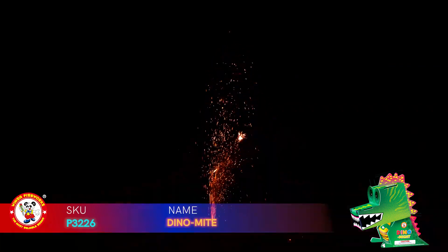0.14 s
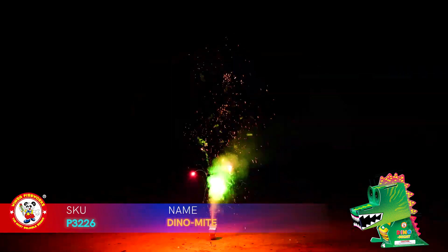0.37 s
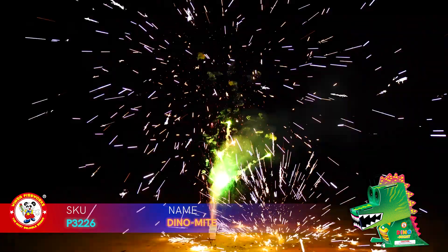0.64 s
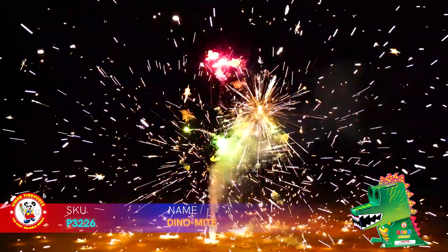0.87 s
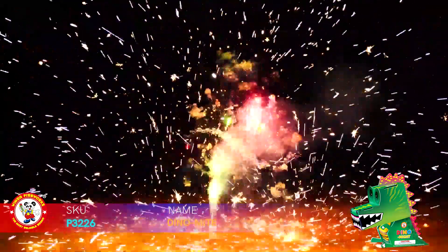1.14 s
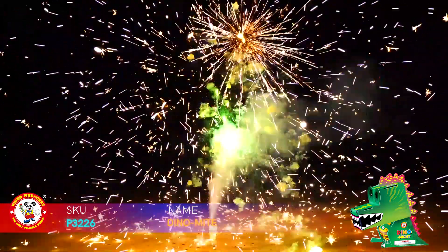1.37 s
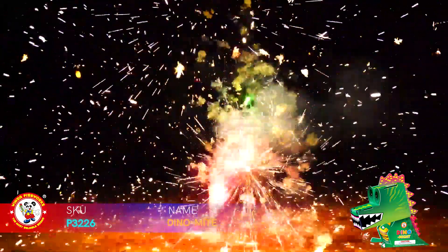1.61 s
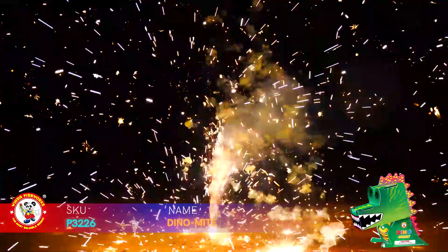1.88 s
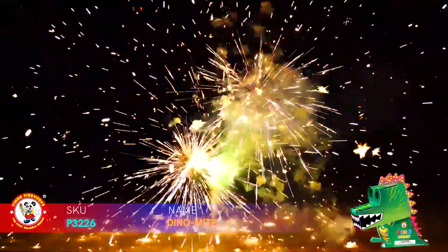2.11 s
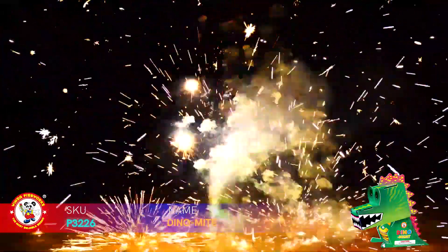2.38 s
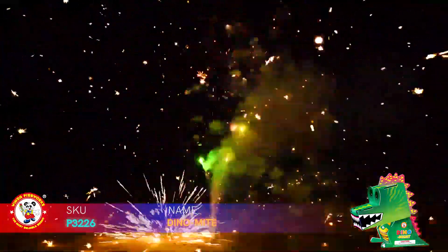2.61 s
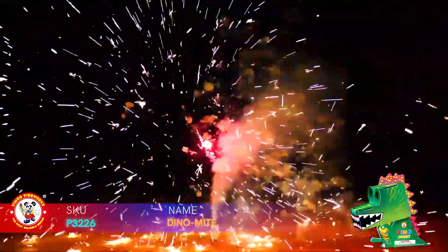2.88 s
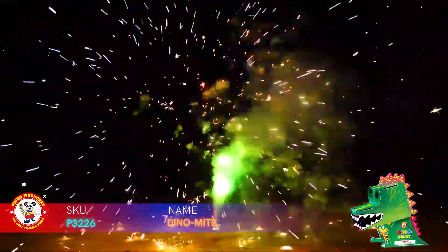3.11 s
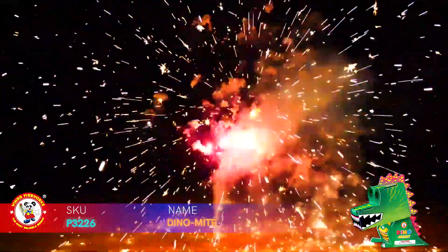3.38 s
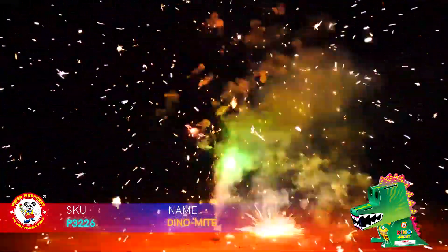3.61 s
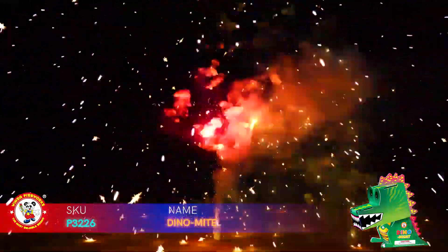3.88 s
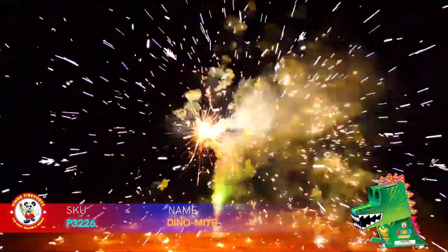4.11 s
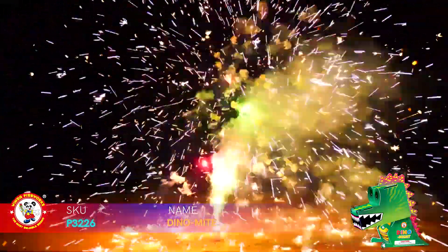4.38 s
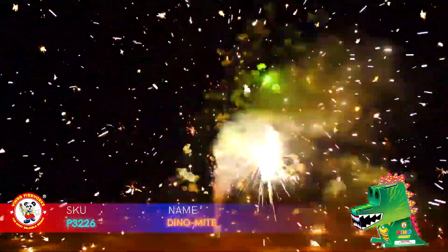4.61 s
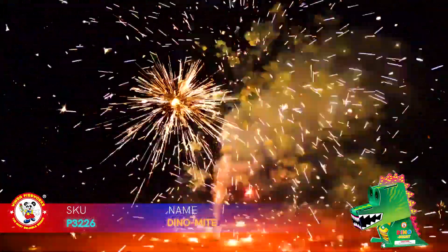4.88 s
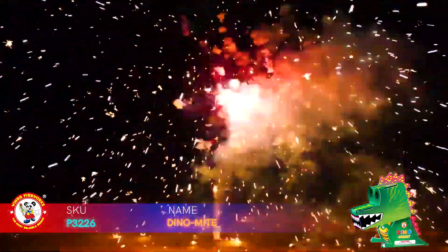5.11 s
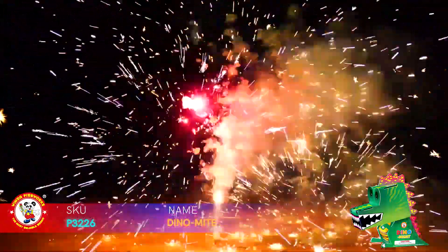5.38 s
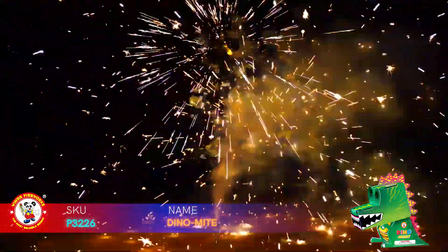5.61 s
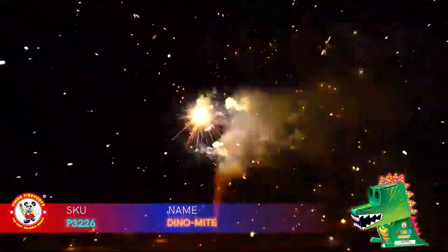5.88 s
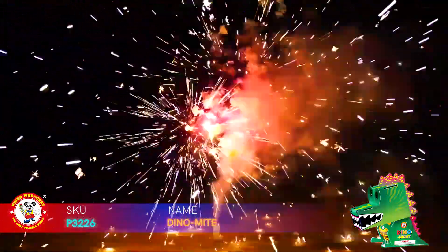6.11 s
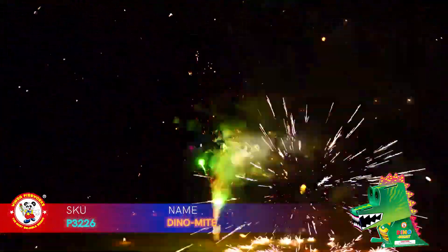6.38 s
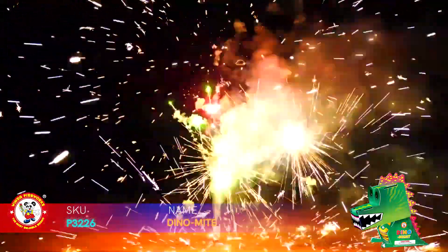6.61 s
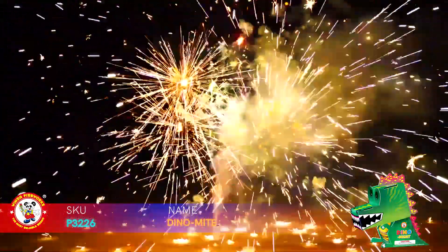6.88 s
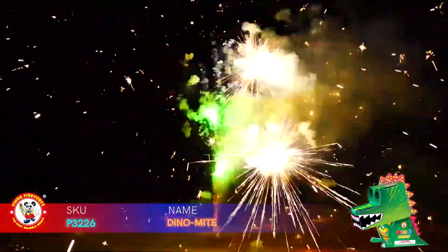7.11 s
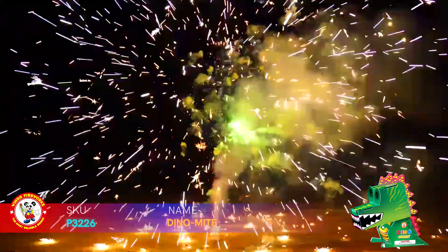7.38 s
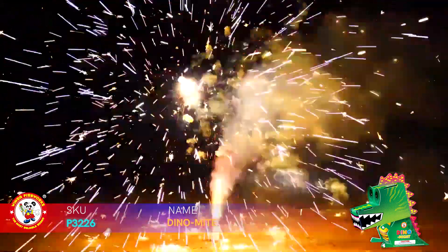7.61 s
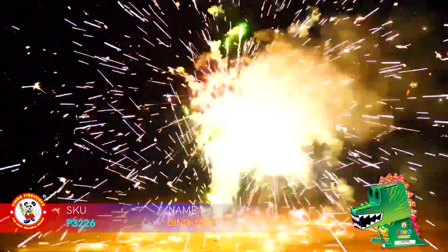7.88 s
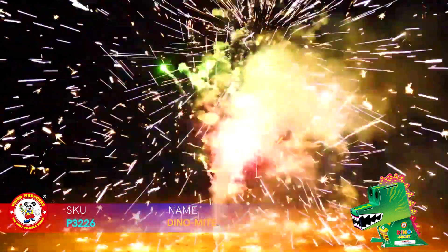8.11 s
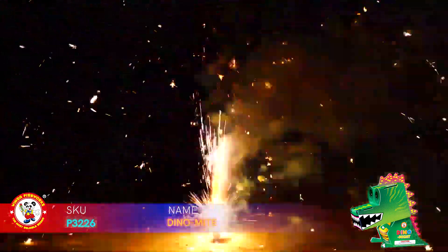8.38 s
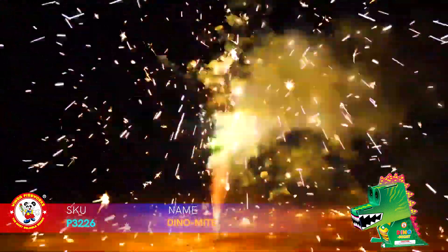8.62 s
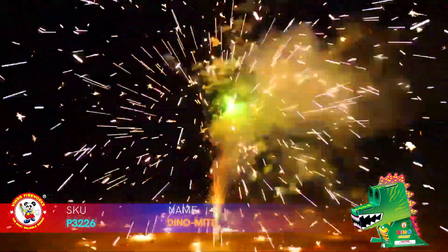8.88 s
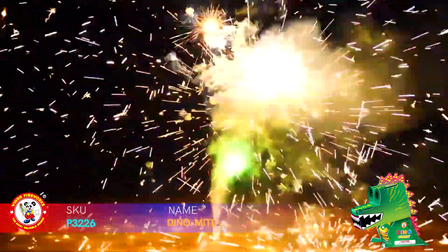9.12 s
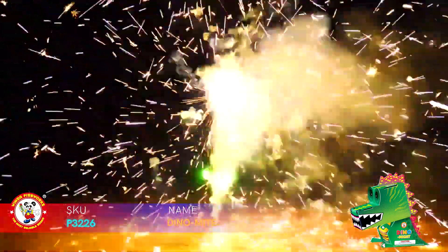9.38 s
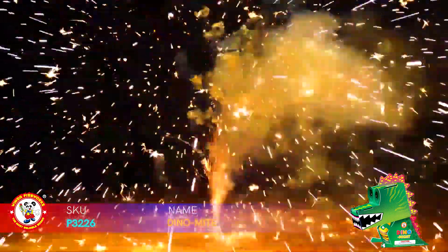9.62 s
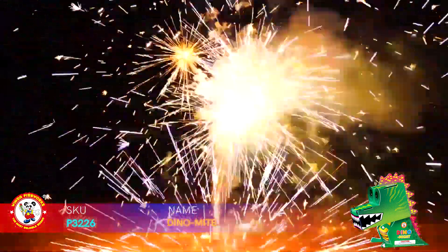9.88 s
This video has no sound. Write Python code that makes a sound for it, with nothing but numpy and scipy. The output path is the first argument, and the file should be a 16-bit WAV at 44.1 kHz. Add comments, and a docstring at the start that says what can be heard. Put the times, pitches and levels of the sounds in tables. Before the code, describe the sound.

Short hollow rush of a firework fountain, then ten-second barrage of bright irregular crackles, a few louder dry snaps, slightly overloaded microphone.

```python
"""A ground firework fountain at night, heard from a few metres away. First its jet roars in the resonances of
the tube and fizzes with sparks; at 0.7 s it drops and burns on, lower, to the end. From then on stars burst in
the air: each blast arrives straight, again off the ground, and again from walls and the wider yard.
From 1.8 s on a few dry, bright snaps with a thump stand out, as if close to the microphone.
The blasts are noise-free pushes of air; the jet is shaped noise. The loudest peaks overload the microphone."""
import sys
import numpy as np
from scipy import signal
from scipy.fft import rfft, irfft, next_fast_len
from scipy.io import wavfile
from scipy.ndimage import map_coordinates

SR = 44100
rng = np.random.default_rng(int(sys.argv[2]) if len(sys.argv) > 2 else 0)


def natural_amplitude(level_db):
    """Convert a level in decibels to a linear amplitude factor, elementwise."""
    exponent = np.asarray(level_db, float) / 20
    return 10 ** exponent


def dump(signal):
    """Clip the signal to [-1, 1] and save it as 16-bit WAV at the path in sys.argv[1]."""
    limited = np.clip(np.atleast_2d(signal).T, -1, 1)
    pcm = np.round(limited * 32767).astype(np.int16)
    wavfile.write(sys.argv[1], SR, pcm)


N = 440982  # length [samples], about 10 s


def along(points, hz):
    """Reads a curve of (frequency [Hz], value) points on a log frequency axis."""
    point_hz, value = np.transpose(points)
    return np.interp(np.log(hz + 1), np.log(point_hz + 1), value)


def unit(x):
    """Scales a sound to an rms of 1."""
    return x / np.sqrt(np.mean(x ** 2) + 1e-20)


def wobble(rate):
    """A smooth random curve through `rate` random points a second."""
    knots = rng.standard_normal(int(N * rate / SR) + 4)
    return map_coordinates(knots, [np.arange(N) * rate / SR])


def filtered(x, response):
    """Multiplies the spectrum of x by a complex response of frequency."""
    size = next_fast_len(x.shape[-1] + 8192)  # room for the ringing
    spectrum = rfft(x, size) * response(np.fft.rfftfreq(size, 1 / SR))
    return irfft(spectrum, size)[..., :x.shape[-1]]


def spread(pair, spectrum, alike):
    """Colours two unrelated noises and mixes them to a left-right likeness, 1 being the same in both ears."""
    def response(hz):
        turn = np.arccos(np.clip(along(alike, hz), -1, 1)) / 2
        return natural_amplitude(along(spectrum, hz)) * [np.cos(turn), np.sin(turn)]
    mid, side = filtered(pair, response)
    return np.array([mid + side, mid - side])


def impulses(s, gain):
    """Places impulses at times between samples, each as a short windowed sinc."""
    at = np.ravel(s)[:, None] * SR
    near = np.floor(at) + np.arange(-7, 9)
    window = np.cos(np.pi * (near - at) / 16) ** 2
    taps = np.ravel(gain)[:, None] * np.sinc(near - at) * window
    return np.bincount(np.clip(near, 0, N).astype(int).ravel(), taps.ravel(), N + 1)[:N]


def blast(hz, push_ms, edge_hz):
    """Spectrum of a small explosion: a push, then an equal suction, behind a rounded edge."""
    u = 2j * np.pi * hz * push_ms / 1000
    return u / (1 + u) ** 2 / (1 + 1j * hz / edge_hz) ** 2


def capsule(hz, ring_hz=12500, width_hz=5000, ring_db=8):
    """The microphone behind its port: treble arrives first and inverted, bass is cut, the port rings."""
    turn_hz, cut_hz = 1530, 610
    port = 1 + natural_amplitude(ring_db) * 1j * hz * width_hz / (ring_hz ** 2 - hz * hz + 1j * hz * width_hz)
    treble_first = (turn_hz - 1j * hz) / (turn_hz + 1j * hz)
    bass_cut = (1j * hz / (1j * hz + cut_hz)) ** 2
    return treble_first * bass_cut * port


# How long the yard rings: (frequency [Hz], time to fall by 60 dB [s])
YARD_RING = [(150, 1), (1000, 1), (4000, 0.9), (14000, 0.69)]
# Tone of the yard: (frequency [Hz], level [dB])
YARD_TONE = [(100, 12.5), (500, -5), (2000, -8), (5500, -0.5), (11000, -9.5), (16000, -1)]
# How alike the yard sounds in both ears: (frequency [Hz], left-right likeness [-1 to 1])
YARD_LIKENESS = [(60, -0.43), (290, 0.89), (640, 0.63), (1400, 0.054), (3100, -0.61), (7000, 0.046)]


def yard(trains):
    """Far surfaces return a wash that dies by band; each group of bursts meets its own paths."""
    wash = np.zeros((2, N))
    for train in trains:
        hz, t, z = signal.stft(rng.standard_normal((2, SR)), SR, nperseg=256)
        clumps = map_coordinates(rng.standard_normal(len(t)), [t * 70])  # surfaces stand in clusters
        swell = (1 - np.exp(-t / 0.0041)) * natural_amplitude(5.9 * clumps)
        decay = natural_amplitude(-60 * t / along(YARD_RING, hz)[:, None])
        tail = signal.istft(z * swell * decay, SR, nperseg=256)[1]
        tail = spread(tail / np.linalg.norm(tail[0]), YARD_TONE, YARD_LIKENESS)
        wash += signal.fftconvolve(train[None], tail, axes=1)[:, :N]
    return wash


# Rough walls and fences: (delay [ms], smear [ms], left level [dB], right level [dB],
# lateness of the left ear before the scaling in walls() [ms])
WALL_ECHOES = [(3.463, 1.0, -24, -18.5, 0.074), (12.09, 1.5, -42, -22.5, 0.25), (15.02, 1, -26, -41, -0.25),
               (26.89, 3, -19.5, -25.5, -0.21), (42.4, 2, -23, -31.5, -0.23), (86.8, 3.5, -27, -20, 0.21),
               (110.4, 1.2, -15.5, -20, -0.25)]


def walls(s, db, facets=10):
    """A rough wall breaks each blast into a cluster of small echoes, stronger on one side."""
    delay_ms, smear_ms, left_db, right_db, late_ms = np.transpose(WALL_ECHOES)[..., None]
    luck = rng.standard_normal((len(s), 4, len(WALL_ECHOES), facets))
    arrive = s[:, None, None] + (delay_ms + smear_ms * luck[:, 0]) / 1000
    swing_db = 3 * luck[:, 1, :, :1]  # a wall answers more or less from burst to burst
    ears = []
    for side, wall_db in ((0.61, left_db), (-0.58, right_db)):
        level = natural_amplitude(db[:, None, None] + wall_db + swing_db)
        facet_gain = luck[:, 2] + side * .5 * luck[:, 3]
        ears.append(impulses(arrive + side * late_ms / 2000, level * facet_gain))
    return np.array(ears)


# The strong jet at the start: (time [s], roar level [dB], fizz level against the roar [dB])
STRONG_JET = [(0.0, -15.5, 0), (0.678, -15, -0.5), (0.7, -23, -3)]
# The jet burning on, lower, at first in short puffs: (time [s], roar level [dB], depth of the puffs [dB])
LOW_JET = [(.7, -21.5, 2), (1.1, -27.5, 5), (1.6, -29, -1), (4, -30.5, 0), (10, -33.5, 2)]
# Resonances of the tube: (frequency [Hz], width [Hz], level before a shared lift [dB])
TUBE_TONES = [(485, 77, 0), (880, 410, 0.5), (1390, 130, 6), (1805, 160, -3), (2780, 190, -10),
              (3200, 170, -9), (3840, 200, -27), (4660, 130, -13), (5430, 310, -8)]
# Tone of the roar before the tube: (frequency [Hz], relative level per Hz [dB])
ROAR_TONE = [(30, -45), (150, -22.5), (400, -9.5), (1500, -7.5), (4500, 1), (7000, -5), (16000, -36)]
# Tone of the fizz: (frequency [Hz], relative level per Hz [dB])
FIZZ_TONE = [(3000, -25.5), (6500, -2), (10000, -7), (15500, -5.5)]
# How alike the jet sounds in both ears: (frequency [Hz], left-right likeness [-1 to 1])
JET_LIKENESS = [(60, 0.96), (240, 1), (950, 0.95), (3770, 0.86), (15000, 0.15)]


def jet():
    """Burning gas rushes out of the tube and sings in its resonances; sparks fizz above."""
    t = np.arange(N) / SR
    s, roar_db, fizz_db = np.transpose(STRONG_JET)
    later_s, later_db, puff_db = np.transpose(LOW_JET)
    strong_db = np.interp(t, s, roar_db)
    low_db = np.interp(t, later_s, later_db) + np.interp(t, later_s, puff_db) * wobble(rate=30)
    level_db = np.where(t < later_s[0], strong_db, low_db)
    sputter = wobble(rate=55)  # shared by roar and fizz

    def sing(hz):
        peaks = sum(natural_amplitude(db) * w * w / (w * w + 4 * (hz - centre) ** 2) for centre, w, db in TUBE_TONES)
        return 1 + natural_amplitude(0.5) * peaks

    roar = unit(filtered(spread(rng.standard_normal((2, N)), ROAR_TONE, JET_LIKENESS), sing))
    fizz = unit(spread(rng.standard_normal((2, N)), FIZZ_TONE, JET_LIKENESS))
    fizz_gain = natural_amplitude(np.interp(t, s, fizz_db) + 3.5 * sputter + 0.91 * wobble(rate=220))
    return natural_amplitude(level_db) * (natural_amplitude(1.8 * sputter) * roar + fizz_gain * fizz)


# Dry snaps, levels before the shared gain: (time [s], snap level [dB], thump level [dB])
SNAP_LIST = [(1.8463, -22, -10), (2.4001, -12, -5), (3.0078, -29, -2), (3.8334, -16, -6), (4.0662, -4, -4),
             (7.739, -13, -4), (8.457, -4, 6.5), (8.466, -7.5, -6), (9.5561, -23, -12)]


def snaps():
    """Each snap is a very short push with a quick twin, over a thump made by a longer push."""
    s, db, thump_db = np.transpose(SNAP_LIST)
    pair = impulses(np.c_[s, s + .00019], natural_amplitude(np.c_[db, db - 1]))
    snap = filtered(pair, lambda hz: blast(hz, push_ms=.04, edge_hz=4500))
    thump = filtered(impulses(s, natural_amplitude(thump_db)), lambda hz: blast(hz, push_ms=0.32, edge_hz=920))
    return natural_amplitude(32) * filtered(snap + thump, capsule)


# Bursting stars: (time [s], delay of the ground bounce [ms])
STAR_BURSTS = [(0.6806, 1.5), (0.7022, 2.5), (0.7097, 1.7), (0.7325, 2.11), (0.7581, 2.5), (0.7715, 2.2),
               (0.7944, 2.3), (0.8141, 2.1), (0.8365, 0.47), (0.8895, 0.56), (0.8923, 1.3), (0.8919, 2.4),
               (0.94, 1.0), (0.9412, 0.74), (0.9482, 1.4), (0.9757, 1.25), (0.98, 2.1), (1.0358, 0.8),
               (1.0488, 0.68), (1.1106, 1.11), (1.1213, 1.8), (1.1241, 0.86), (1.1259, 1.84), (1.142, 2.1),
               (1.1539, 1.2), (1.1827, 1.45), (1.1984, 0.92), (1.2003, 0.8), (1.2177, 2.4), (1.2352, 1.77),
               (1.2929, 2.8), (1.3131, 0.52), (1.3158, 0.36), (1.3207, 1.06), (1.3371, 1.9), (1.3874, 1.25),
               (1.397, 0.8), (1.4277, 2.16), (1.4284, 1.27), (1.4296, 0.91), (1.4431, 3.2), (1.4717, 0.38),
               (1.4729, 1.7), (1.4915, 2.9), (1.5458, 1.3), (1.5611, 3.8), (1.5666, 0.71), (1.5739, 1.3),
               (1.5821, 1.8), (1.594, 1.5), (1.6, 0.87), (1.6109, 1.24), (1.6422, 3.3), (1.6439, 1.56),
               (1.7049, 2.9), (1.723, 0.57), (1.7445, 1.1), (1.7559, 3.9), (1.768, 1.65), (1.7785, 1.5),
               (1.7826, 1.5), (1.805, 2.43), (1.8116, 0.67), (1.866, 0.3), (1.8854, 2.7), (1.9262, 2.3),
               (1.9386, 1.04), (1.994, 2.3), (2.0425, 1.0), (2.0704, 1.74), (2.0845, 1.11), (2.135, 1.6),
               (2.1469, 1.6), (2.2002, 1.26), (2.2113, 2.1), (2.2235, 1.4), (2.2877, 2.7), (2.3176, 0.81),
               (2.3292, 1.6), (2.433, 3.58), (2.4476, 0.5), (2.472, 1.3), (2.4809, 0.77), (2.5046, 3.6),
               (2.5098, 2.6), (2.7426, 1.32), (2.7822, 2.9), (2.8933, 0.7), (2.899, 1.9), (2.9366, 3.2),
               (2.9425, 2.2), (2.9533, 1.16), (3.0266, 1), (3.0992, 1.06), (3.1549, 2.06), (3.1737, 1.6),
               (3.2395, 3), (3.257, 3.1), (3.262, 0.99), (3.2752, 2.65), (3.33, 0.45), (3.333, 2.4),
               (3.3453, 1.47), (3.363, 1.9), (3.3841, 2.8), (3.4168, 2), (3.445, 2), (3.4713, 1.8),
               (3.5344, 1.66), (3.5378, 1.38), (3.568, 2), (3.5762, 2), (3.6125, 0.51), (3.6173, 0.55),
               (3.6572, 2.7), (3.7543, 0.63), (3.7689, 0.72), (3.8069, 3.8), (3.8153, 2.88), (4.0434, 0.37),
               (4.0919, 1.2), (4.1037, 0.8), (4.1162, 2.11), (4.1534, 0.79), (4.162, 1.29), (4.1757, 1.9),
               (4.2265, 1.7), (4.2537, 3.2), (4.3059, 0.61), (4.3143, 1.1), (4.347, 0.71), (4.3622, 2.4),
               (4.398, 2.8), (4.4191, 1.16), (4.4284, 1.8), (4.4319, 1.61), (4.4407, 3), (4.4509, 1.05),
               (4.4631, 3), (4.4665, 1.1), (4.47, 2), (4.5163, 1.9), (4.5425, 0.66), (4.5488, 1.4),
               (4.5606, 0.7), (4.571, 1.6), (4.6449, 1.44), (4.6531, 2.4), (4.7495, 1.44), (4.7713, 0.66),
               (4.8019, 2.9), (4.8254, 0.48), (4.9132, 1.5), (4.9289, 2.6), (4.932, 2.52), (4.936, 0.65),
               (4.9764, 2.06), (5.0113, 3.1), (5.055, 2.4), (5.0818, 2.8), (5.1041, 1.7), (5.1067, 1.1),
               (5.1085, 3.02), (5.2285, 2.5), (5.245, 1.7), (5.3196, 2.15), (5.323, 1.46), (5.359, 2.2),
               (5.3813, 1), (5.395, 1.47), (5.426, 1.6), (5.427, 2.1), (5.4374, 1), (5.4722, 1.3),
               (5.5211, 2.1), (5.5532, 2.3), (5.561, 2.1), (5.5778, 1.45), (5.6335, 3.17), (5.6429, 1.5),
               (5.7103, 1.54), (5.7217, 2.7), (5.776, 1.8), (5.811, 0.64), (5.9886, 1.97), (6.016, 3.1),
               (6.0248, 2), (6.0913, 3), (6.134, 1.8), (6.146, 1.8), (6.1961, 2.1), (6.214, 1.8),
               (6.4901, 0.89), (6.512, 2.3), (6.5308, 2), (6.5699, 0.77), (6.5859, 1.9), (6.6554, 2.7),
               (6.6744, 2.31), (6.7139, 0.67), (6.7198, 0.99), (6.744, 1.1), (6.7466, 1.67), (6.7875, 1.7),
               (6.8026, 2.6), (6.837, 3), (6.8678, 1.6), (6.8895, 2.27), (6.9366, 2), (6.9555, 1.29),
               (6.9727, 2.8), (6.9742, 0.44), (7.047, 2.8), (7.2183, 2.24), (7.2232, 1.36), (7.3058, 2.7),
               (7.3665, 2.3), (7.3824, 1.5), (7.3919, 3.61), (7.3968, 1.9), (7.396, 3.67), (7.421, 1.5),
               (7.4425, 1.84), (7.4496, 2), (7.576, 1.8), (7.6648, 3), (7.681, 1.4), (7.6944, 1.88),
               (7.746, 2.5), (7.7575, 1.13), (7.7582, 0.65), (7.7756, 0.5), (7.8385, 2.3), (7.9039, 2),
               (7.927, 1.6), (7.9347, 1.9), (7.9665, 2.2), (7.9849, 0.31), (8.007, 1.97), (8.0273, 1.18),
               (8.0499, 0.8), (8.0696, 1.93), (8.0964, 1.7), (8.1127, 3.2), (8.1505, 2.7), (8.174, 1.05),
               (8.1871, 2.4), (8.194, 0.88), (8.1969, 3), (8.2355, 3), (8.2759, 1.1), (8.2798, 2.29),
               (8.5129, 0.31), (8.5214, 3.1), (8.5277, 1.2), (8.5328, 1.6), (8.5607, 1.8), (8.565, 0.77),
               (8.5955, 1.4), (8.6003, 0.36), (8.6475, 2.9), (8.7522, 2.3), (8.7867, 3.2), (8.8257, 0.45),
               (8.8427, 1.76), (8.853, 1.25), (8.8839, 1.66), (8.9366, 3), (8.9833, 1.6), (9.0632, 1.94),
               (9.0794, 2.6), (9.0832, 2), (9.1523, 2.1), (9.1757, 1.66), (9.2009, 0.6), (9.2056, 3.7),
               (9.2148, 2.9), (9.2454, 1.9), (9.3463, 0.74), (9.378, 2.6), (9.3915, 0.54), (9.3983, 3.5),
               (9.4327, 1.66), (9.445, 2.3), (9.449, 1.5), (9.5027, 1.9), (9.5225, 2), (9.5354, 1.5),
               (9.5376, 1.66), (9.5458, 2), (9.5516, 2.2), (9.5739, 2.4), (9.5809, 1.88), (9.592, 2.43),
               (9.6015, 2.68), (9.67, 2.22), (9.7556, 2.4), (9.764, 1.79), (9.8151, 2.1), (9.8439, 3.9),
               (9.8936, 3.2), (9.928, 1.13), (9.963, 2), (9.9935, 0.68)]


def bursts():
    """Time, level, bounce delay and bounce level of the stars and of the smaller crumbs some leave behind."""
    star_db, scatter_db = 1.5, 1.65  # levels before the shared gain in stars()
    crowded_db, recover_s = 4, 0.024  # a burst close behind another comes weaker
    ground_db, ground_db_per_ms = -2.5, 0.03  # bounce against blast; a later bounce is slightly stronger
    crumb_share = .15  # chance that a star leaves a crumb
    crumb_db, crumb_spread_db, crumb_wait_s = -5.5, 1, .008  # the wait is a mean, after the ground bounce
    s, bounce_ms = np.transpose(STAR_BURSTS)
    luck, chance = rng.standard_normal((len(s), 4)), rng.random((len(s), 3))
    crowding = np.exp(-np.abs(np.diff(s, prepend=0)) / recover_s)
    db = star_db - crowded_db * crowding + scatter_db * luck[:, 0]

    has = chance[:, 0] < crumb_share
    crumb_s = s + bounce_ms / 1000 - crumb_wait_s * np.log(1 - chance[:, 1])
    crumb_level_db = crumb_db + crumb_spread_db * luck[:, 1]
    crumb_bounce_ms = .4 + 2.4 * chance[:, 2]
    s = np.r_[s, crumb_s[has]]
    db = np.r_[db, crumb_level_db[has]]
    bounce_ms = np.r_[bounce_ms, crumb_bounce_ms[has]]

    bounce_scatter_db = scatter_db * np.r_[luck[:, 2], luck[has, 3]]
    bounce_db = db + ground_db + ground_db_per_ms * bounce_ms + bounce_scatter_db
    return s, db, bounce_ms, bounce_db


def stars():
    """Every burst sends its push along the straight path, the ground bounce, the walls and the yard."""
    s, db, bounce_ms, bounce_db = bursts()
    s = s - .00015  # the peak of the push follows its front
    luck = rng.standard_normal((len(s), 4))
    left_lag = 14e-6 + 26e-6 * luck[:, 0]  # [s], bursts spread across the sky
    large = np.clip(.5 + 0.71 * luck[:, 1], 0, 1)  # larger stars push longer
    ears = []
    for side in (1, -1):  # left, right
        arrive = s + side * left_lag / 2
        times = np.c_[arrive, arrive + bounce_ms / 1000]
        levels = np.c_[db, bounce_db] + side * 1.85 * luck[:, 2:3]
        ears.append([impulses(times, natural_amplitude(levels) * share[:, None]) for share in (large, 1 - large)])
    ears = np.array(ears)

    groups = 5
    wash = natural_amplitude(4.5) * yard([impulses(s[k::groups], natural_amplitude(db[k::groups])) for k in range(groups)])
    big = filtered(ears[:, 0] + wash / 2, lambda hz: blast(hz, push_ms=.065, edge_hz=2800))
    small = filtered(ears[:, 1] + wash / 2, lambda hz: blast(hz, push_ms=0.045, edge_hz=4060))
    echoes = filtered(walls(s, db), lambda hz: blast(hz, push_ms=0.051, edge_hz=3760))
    # the shortest bounces thud a hair more
    thud_db = db + 2.3 * np.exp(-bounce_ms / 0.057) + 2.36 * luck[:, 3]
    thud = filtered(impulses(s, natural_amplitude(thud_db)), lambda hz: blast(hz, push_ms=0.2, edge_hz=883))
    return natural_amplitude(27.5) * filtered(big + small + echoes + thud, capsule)


def scene():
    """Jet, snaps and stars together."""
    return jet() + snaps() + stars()


def band_limit(x):
    """A steep low-pass at the top of the band."""
    return signal.sosfilt(signal.butter(12, 16490, fs=SR, output="sos"), x)


def record(dry):
    """The input stage flattens the blasts softly near full scale; deepest bass and highest treble are cut."""
    top_hz, bass_hz = 15800, 70
    clipped = dry / (1 + np.abs(dry / 1.1) ** 5) ** (1 / 5)  # never beyond 1.1, full scale being 1
    mix = filtered(clipped, lambda hz: (hz < top_hz) * 1j * hz / (1j * hz + bass_hz))
    return band_limit(mix)


dry = scene()
out = record(dry)
dump(out)
```